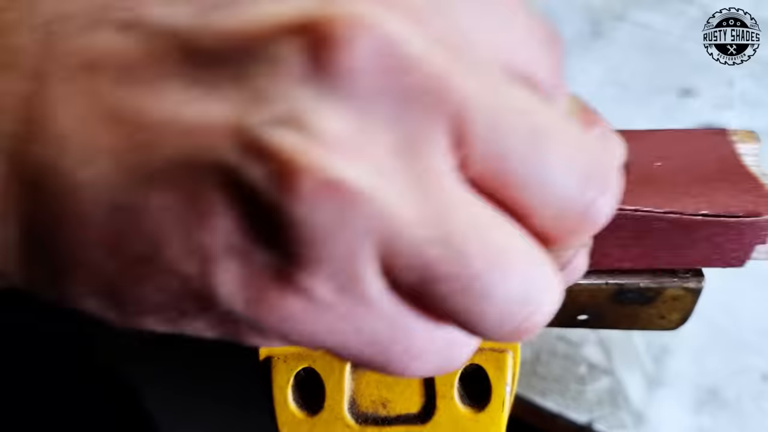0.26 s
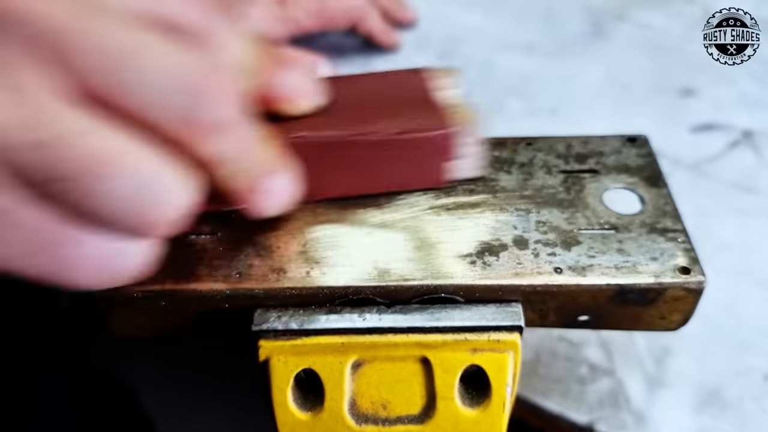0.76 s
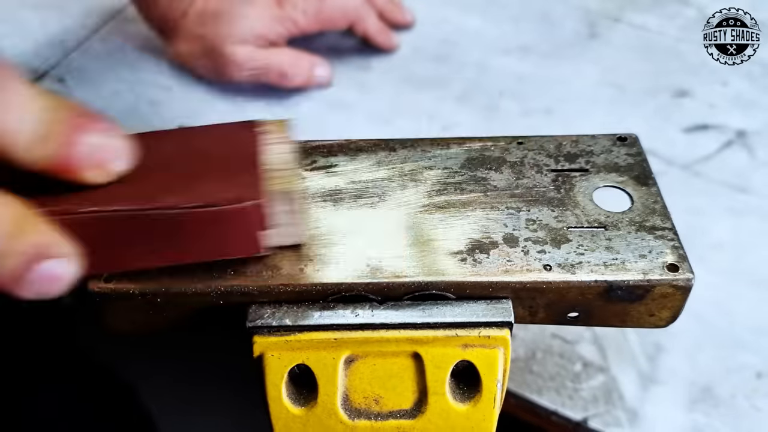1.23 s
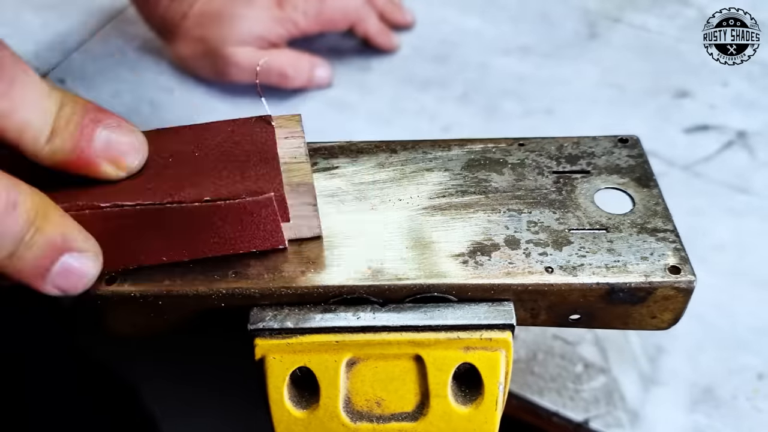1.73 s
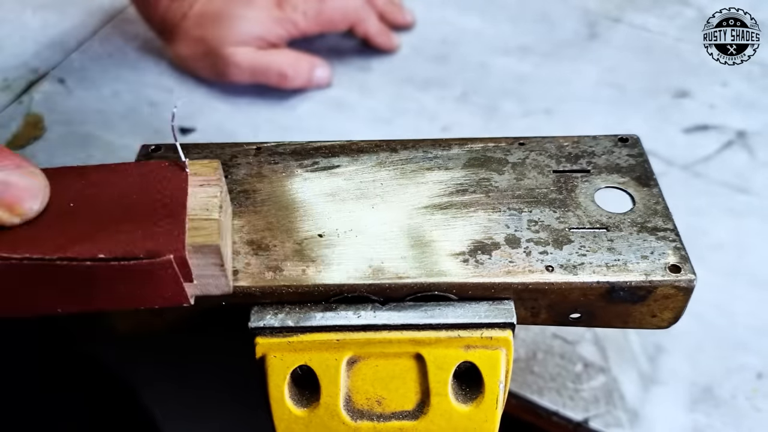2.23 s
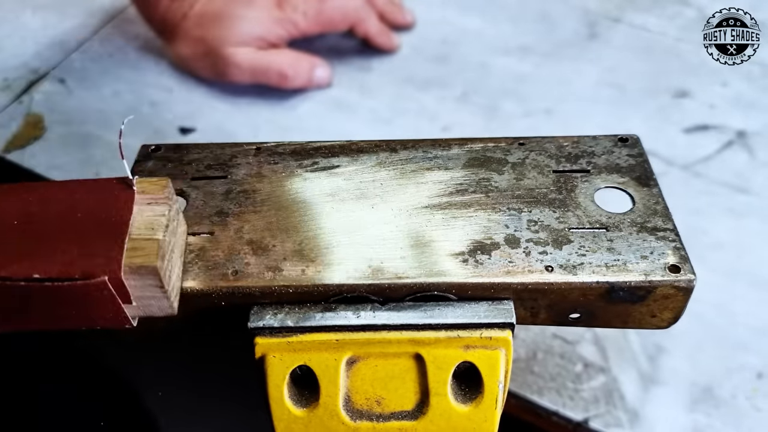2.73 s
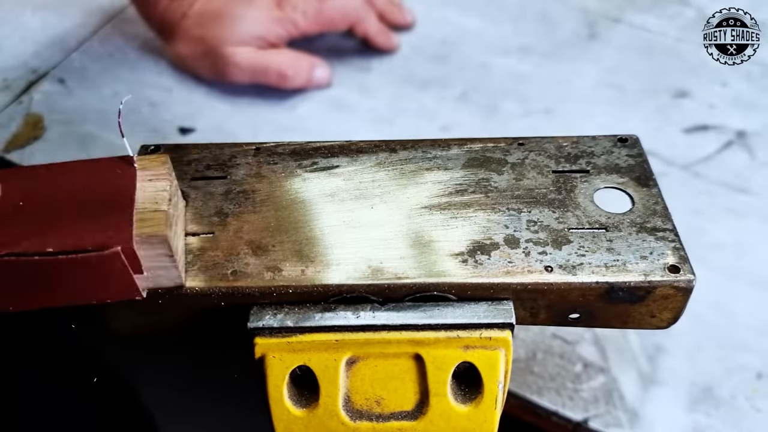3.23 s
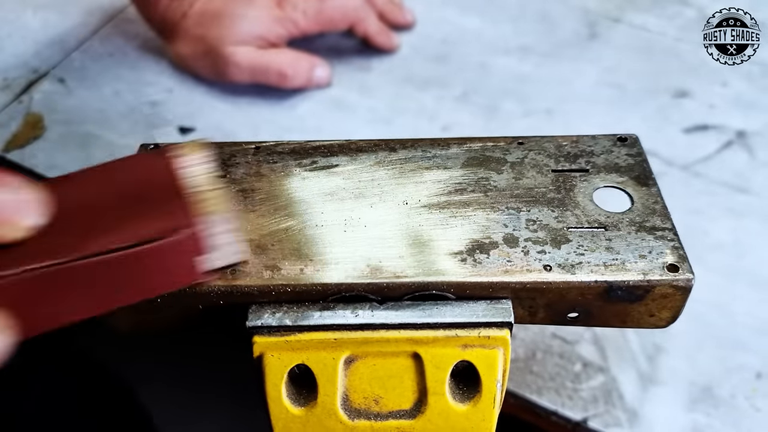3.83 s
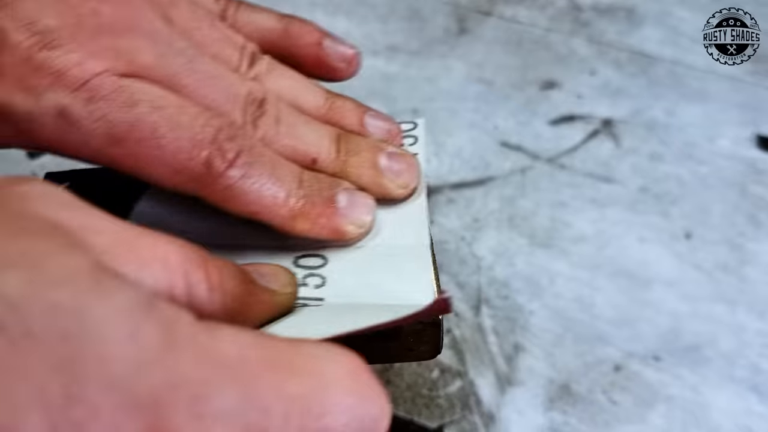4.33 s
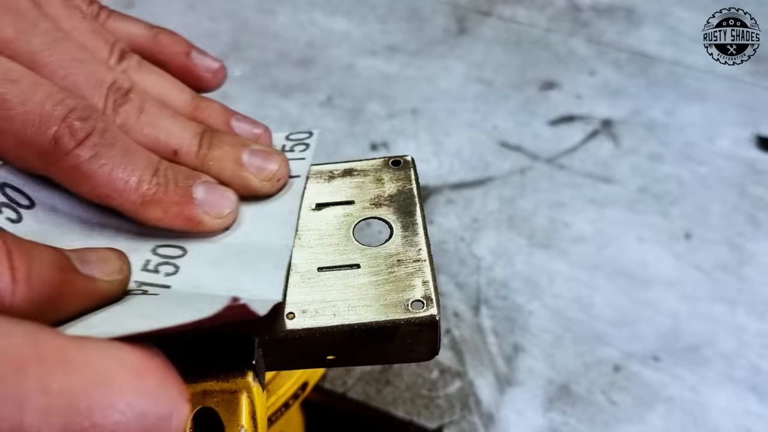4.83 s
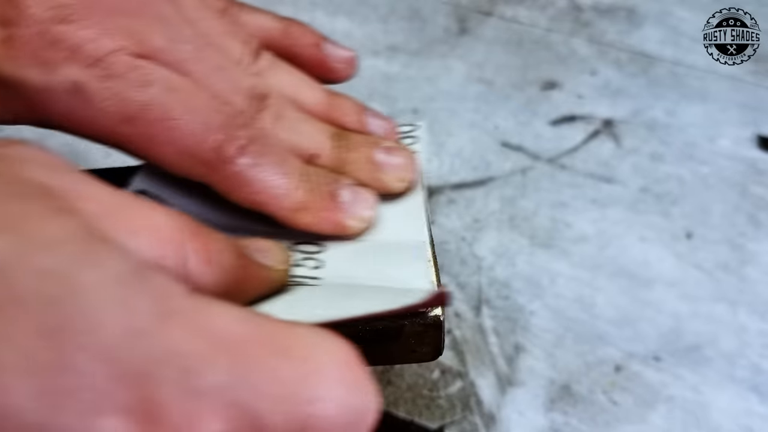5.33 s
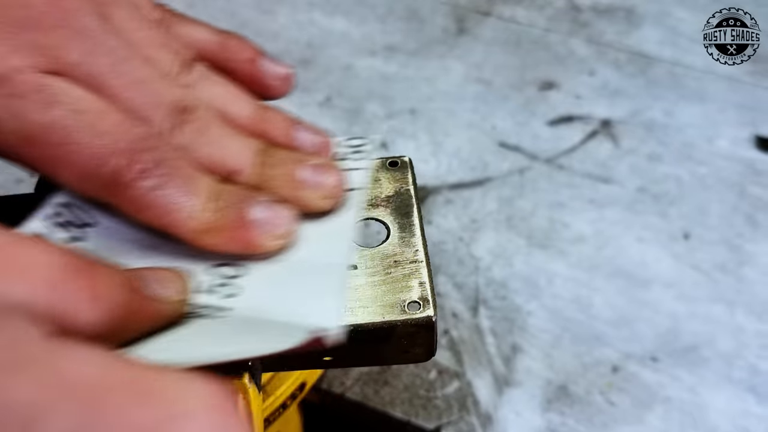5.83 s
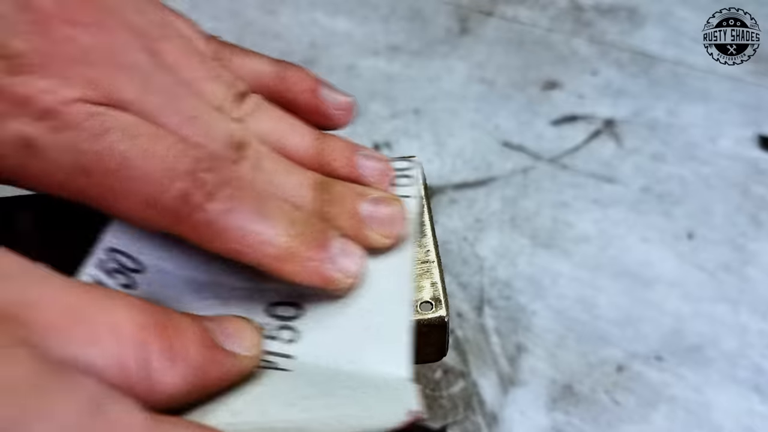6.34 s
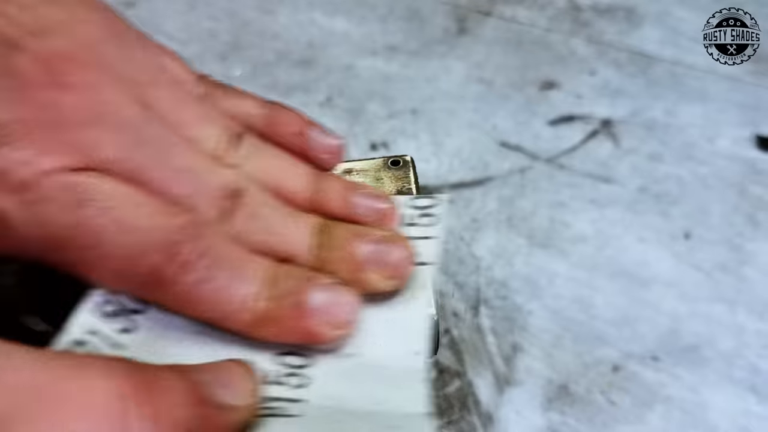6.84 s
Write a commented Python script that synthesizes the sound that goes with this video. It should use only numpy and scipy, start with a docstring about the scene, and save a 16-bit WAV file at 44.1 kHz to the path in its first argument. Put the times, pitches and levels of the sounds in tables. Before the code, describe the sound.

Close stereo sanding of a brass plate in a vice, in a quiet workshop with a short, faint room response. From 0 to about 4.2 seconds a wrapped block scrubs back and forth at roughly twelve strokes a second, scarcely pausing at the turns. At first it is bright, gritty hiss with rough catches, strongest around 0.2 to 1 second. After about 2.2 seconds it grows duller, hollower and quieter, with brief brassy ringing on the catches. Low bench rumble and soft thuds pulse underneath. At 4.2 seconds a loose sheet takes over at half the pace, about six strokes a second: longer papery scrapes, raspier on the pull, the plate damped and drumming faintly on pushes. Snags rasp near 4.8 and 6.6 seconds, ticks snap near 4.8, 6.1 and 6.4, with light finger knocks from 6. The strokes strengthen until the end at about 7.1 seconds.

```python
"""Sanding a brass plate by hand

A brass lock plate in a vice is sanded close to a stereo microphone in a workshop, over quiet room tone.
A wrapped block scrubs fast, then a loose sheet goes at half the pace, rasping more on the pull.
Scrapes are coloured grit noise driven by hand speed and pressure; catches and rubbing ring plate modes.
The bench adds low rumble and decaying thuds; sparse reflections add the workshop."""
import sys
import numpy as np
from scipy import signal
from scipy.fft import rfft, irfft, next_fast_len
from scipy.io import wavfile
from scipy.ndimage import uniform_filter1d

SR = 44100
rng = np.random.default_rng(int(sys.argv[2]) if len(sys.argv) > 2 else 0)


def master_out(mix):
    """Clip the mix to full scale and print it as 16-bit PCM to the path in sys.argv[1]."""
    frames = np.transpose(np.atleast_2d(mix))
    ceiling = np.clip(frames, -1, 1)
    pcm = np.round(ceiling * 32767).astype(np.int16)
    wavfile.write(sys.argv[1], SR, pcm)


N = 311787
TIME_S = np.arange(N) / SR
BLOCK_END_S, SHEET_END_S = 4.172, 7.16
EDGE_HZ = 15880

# Event and layer levels are in dB ahead of the mix gains. Strokes alternate, push first.
# Block strokes. Each row: start in seconds, mid-stroke pressure in dB, pressure gained on the way in dB.
BLOCK_STROKES = [(-0.014, -44.5, 2), (0.081, -44.5, -7), (0.18, -45.9, -2), (0.269, -45, -5),
                 (0.354, -46, 0), (0.453, -43.5, -4), (0.532, -44.5, 7.5), (0.635, -42, -3),
                 (0.705, -44.5, 2), (0.79, -45, -1), (0.878, -47.5, 2), (0.973, -44.5, -8),
                 (1.063, -46.5, 3), (1.163, -43.5, -15), (1.247, -44.5, 5), (1.335, -44, -4),
                 (1.418, -43.5, 11), (1.496, -45, -5), (1.585, -43, -1.5), (1.659, -45, -12),
                 (1.743, -44.5, -1), (1.822, -44.1, -5), (1.905, -45.0, 4), (1.987, -43.5, -8.5),
                 (2.075, -43.5, 1), (2.16, -44.5, -8), (2.236, -46.5, -3), (2.314, -47.5, 3),
                 (2.4, -47, -1), (2.48, -45, 0), (2.563, -47, -3), (2.651, -47, 0), (2.733, -49, -1),
                 (2.821, -46.5, 3), (2.91, -47.5, 2), (2.993, -49.1, 6), (3.072, -49, -6), (3.158, -48, -1),
                 (3.234, -49.9, -3), (3.32, -49.7, 4), (3.396, -48.5, 2), (3.483, -50, -1),
                 (3.556, -49.5, -1), (3.628, -51.5, 4), (3.712, -51.5, -2), (3.792, -49.5, 4),
                 (3.873, -51, 0), (3.953, -45, 2), (4.035, -47, 4), (4.112, -52, -8)]
# Sheet strokes. Each row: start in seconds, mid-stroke pressure in dB, pressure gained on the way in dB
# (also raises the hiss), an unused value.
SHEET_STROKES = [(4.205, -49, 5.5, 1.5), (4.39, -50, 2.5, -2.6), (4.547, -47, 4.5, 1.4),
                 (4.729, -45.5, 5.5, -3.2), (4.877, -46, -0.5, -1.7), (5.089, -47.5, 3, -4.7),
                 (5.235, -45, 1, 0.2), (5.425, -45.5, 2.5, -2.9), (5.586, -44, 2.5, 0.7),
                 (5.767, -44.5, 5.5, -1.5), (5.938, -43.5, 2, 0.8), (6.127, -45.5, -1.5, -7.1),
                 (6.28, -43.5, -1, -0.1), (6.452, -44.5, 2.5, -3.9), (6.636, -41.5, 5, 2.7),
                 (6.807, -44.5, 4, -2.2), (6.991, -40, 2.5, -0.1)]
# Stroke shape, push then pull. Each row: share spent speeding up, share spent slowing down.
BLOCK_SWING = [(.27, 0.49), (.56, 0.39)]
SHEET_SWING = [(0.45, .52), (0.29, .5)]
# Tip of the block over the near end of the plate. Each row: time in seconds, tilt (0 = flat).
BLOCK_TILT = [(0, 0.75), (.95, 0.59), (1.3, 0.46), (1.95, .35), (2.3, 0.89), (3, 0.84), (3.6, 1.2),
              (4.05, 0.98)]
# Hiss, rasp and body of the block. Each row: level when flat in dB, change per tilt in dB,
# further change per tilt at full reach in dB.
BLOCK_LAYERS = [(7.5, -8, -2.5), (-0.72, -0.1, 0.5), (-11.3, 7.8, 2)]
# Hiss, rasp and body of the sheet. Each row: level on a push in dB, level on a pull in dB.
SHEET_LAYERS = [(-3, -4.5), (-2.5, 0), (-6, -6.5)]

# Regular catch of the block, push then pull. Each row: share of the stroke, Gaussian sigma in seconds,
# level over the pressure in dB at tilt 1.5.
CATCH_RULE = [(0.725, 0.0087, 3.5), (0.48, .011, -1)]
CATCH_DB_PER_TILT = 15
# Hard catches of the block. Each row: time in seconds, level in dB.
HARD_CATCHES = [(.054, -47.5), (.196, -38), (.332, -40.5), (.517, -41.5), (.547, -41), (.947, -39),
                (.986, -41.5), (2.119, -47.5), (2.285, -46.5), (2.452, -41.5), (2.8, -46), (3.136, -47),
                (3.457, -45.5), (3.524, -48), (3.604, -46.5), (3.768, -47), (3.83, -45.5), (4.131, -50.5)]
# The sheet snags and rasps. Each row: time in seconds, level in dB.
SNAGS = [(4.804, -37.5), (4.96, -44), (5.128, -45.5), (5.467, -47), (6.22, -43.5), (6.583, -40),
         (6.91, -42.5)]
# Fingers knock the sheet on the plate. Each row: time in seconds, level in dB.
KNOCKS = [(4.758, -51.5), (5.278, -62), (5.955, -45), (6.482, -47), (6.893, -43.5)]
# A coarse grain snaps. Each row: time in seconds, level in dB.
TICKS = [(4.797, -39), (6.079, -39), (6.4, -36.5), (6.415, -50)]
HARD_CATCH_SIGMA_S, SNAG_SIGMA_S, KNOCK_SIGMA_S, TICK_SIGMA_S = 0.0083, 0.013, 0.0049, 0.00078

# Spectra of grit, paper, body under them, and catches. Each row: frequency in Hz, relative density in dB.
BLOCK_HISS_SPECTRUM = [(2500, -41), (4000, -5), (5200, -4), (6800, 0.5), (7500, -3), (8300, -9),
                       (10000, -7.5), (12300, -6.5), (13200, -7.5), (15400, -6.5)]
BLOCK_RASP_SPECTRUM = [(1400, -26.5), (2300, -9), (2700, -1.3), (3100, 0.5), (4000, -1.4), (4800, -2.5),
                       (7500, -23.5)]
BLOCK_BODY_SPECTRUM = [(100, -21.5), (160, -16.5), (205, -8.5), (260, -24), (400, -18), (580, -17.5),
                       (720, -1), (1000, -3.5), (1500, 3.5), (2000, 2), (2500, -1), (4000, -14)]
SHEET_HISS_SPECTRUM = [(2500, -19), (4200, -9), (5100, 0), (5800, -0.8), (7100, 2.5), (7700, -5.5),
                       (8500, -8), (11800, -5), (13200, -6), (15400, -4.5)]
SHEET_RASP_SPECTRUM = [(1400, -32), (2300, -15), (2800, -1.5), (3400, 0.5), (4000, -1.5), (4700, -8),
                       (7500, -26.5)]
SHEET_BODY_SPECTRUM = [(100, -21), (155, -57), (210, -10.5), (270, -14.5), (400, -8.5), (500, -8.5),
                       (680, -4.5), (850, -4), (1100, -1.5), (1500, 3), (2000, 0.5), (2500, -1.5),
                       (4000, -28.5)]
CATCH_SPECTRUM = [(150, -24), (205, -5), (270, -24), (400, -13.5), (520, -21.5), (700, 0.5), (1000, -3.5),
                  (1500, -1.5), (2100, -4.5), (3000, -4), (6000, -21), (12000, -48)]
# Spectra of plate drumming, bench rumble and room tone. Each row: frequency in Hz, relative density in dB.
DRUM_SPECTRUM = [(100, -9), (150, -20.5), (190, -2.5), (220, 1.5), (270, -16), (400, -3), (520, -20),
                 (660, 0.5), (900, -24)]
BENCH_SPECTRUM = [(20, -13), (40, -24), (60, -5.5), (79, 6), (100, -1.5), (140, -17), (205, -11.5),
                  (260, -32), (600, -52)]
ROOM_SPECTRUM = [(20, -28), (80, -2.5), (200, -16), (600, -4), (3000, -4), (16000, -19)]
# Wander of the scrape's colour. Each row: frequency in Hz, spread in dB.
COLOUR_WANDER = [(200, 3.5), (800, 3.5), (2000, 2.5), (5000, 2.2), (15000, 3)]

# Plate modes, free and under the flat hand. Each row: frequency in Hz, width in Hz, relative level in dB.
FREE_PLATE_MODES = [(849, 21, -9), (1010, 100, -9), (1421.4, 38, 6.5), (1534, 15, -2), (1720, 15, -45),
                    (1850, 23, 3)]
DAMPED_PLATE_MODES = [(1156, 350, 0)]
# Freedom of the plate to ring as the block uncovers it. Each row: time in seconds, linear gain.
PLATE_FREEDOM = [(2.0, 0.16), (2.45, 1), (3.5, 1.19), (4.13, 0.83), (4.15, 0.14)]
# The plate drums under the flat hand on pushes. Each row: time in seconds, level in dB.
DRUM_LEVEL = [(4.3, -65.5), (5.0, -60.5), (6.4, -61.5), (6.7, -76)]
# Work shaking the bench. Each row: time in seconds, rumble level in dB, jolt level in dB.
BENCH_SHAKING = [(0, -79, -57), (1.1, -82, -82), (1.5, -74, -64), (2.35, -82, -54.5), (2.6, -77.5, -68),
                 (3.4, -75.5, -57), (4.0, -76, -74), (4.3, -85, -74.5), (5.4, -82.5, -59.5),
                 (6.4, -76, -60.5), (7, -81, -84)]
# Jolt as the hand brakes: share of each block pull, share of each sheet push.
BLOCK_JOLT_SHARE, SHEET_JOLT_SHARE = 0.646, 0.74

# Likeness of the two microphones. Each row: frequency in Hz, correlation (clipped to -1..1 in use).
BLOCK_LIKENESS = [(40, 6.3), (80, 0.5), (200, 0.17), (500, 0.07), (16000, -0.03)]
SHEET_LIKENESS = [(200, 1), (550, 0.14), (1200, 1), (2500, 0.42), (3700, 0.29), (6000, 0.089),
                  (16000, 0.04)]
# Balance of the two microphones. Each row: frequency in Hz, left minus right in dB.
BLOCK_BALANCE = [(60, 8), (92, -3.5), (140, -10), (210, -3), (330, 3.5), (500, 0), (770, 3), (1170, 4.5),
                 (1790, 2), (2740, 1), (4190, -1), (6410, -1), (9810, -0.5), (15000, 2)]
SHEET_BALANCE = [(60, 9), (92, -7), (140, 0), (210, 0), (330, 2.5), (500, 10), (770, 1.5), (1170, 3.5),
                 (1790, 2.5), (2740, 4), (4190, 3.5), (6410, 4), (9810, 0.5), (15000, 3.5)]
# Slow drift of the sanding's left-right balance. Each row: time in seconds, left minus right in dB.
BALANCE_DRIFT = [(0, 0), (1.7, 1), (3.0, 1.4), (3.8, 1.5), (5.3, -1), (6.9, 1.5)]
# Reverberation. Each row: frequency in Hz, 60 dB decay time in seconds.
WORKSHOP_T60 = [(100, 0.45), (1000, 0.27), (4000, 0.2), (9000, 0.15), (16000, 0.13)]


def amp(db):
    """Decibels to linear gain."""
    return 10 ** (np.asarray(db) / 20)


def over_hz(points, hz):
    """Table interpolated on a log-frequency axis."""
    point_hz, value = np.transpose(points)
    return np.interp(np.log(hz + 1), np.log(point_hz), value)


def over_time(points):
    """Two-column table interpolated at every sample."""
    return np.interp(TIME_S, *np.transpose(points))


def convolve(x, response):
    """Convolution with responses scaled to unit energy."""
    response = np.atleast_2d(response)
    unit_response = response / np.linalg.norm(response, axis=1, keepdims=True)
    return signal.oaconvolve(x, unit_response, axes=1)[:, :N]


def colour(x, spectrum, size=4096):
    """Minimum-phase filter of the given spectrum, falling away below its lowest point."""
    hz = abs(np.fft.fftfreq(size, 1 / SR))
    low_cut = np.minimum((hz + 10) / spectrum[0][0], 1) ** 2
    log_gain = np.log(amp(over_hz(spectrum, hz)) * low_cut)
    minimum_phase = np.exp(np.conj(signal.hilbert(log_gain)))
    return convolve(x, np.fft.ifft(minimum_phase).real)


def grit(per_s, spread_db, smooth):
    """Uneven clicks of grains cutting metal, mixed with the smooth hiss of the finest."""
    size = amp(spread_db * np.clip(rng.standard_normal(N), -2, 2)) * (rng.random(N) < per_s / SR)
    clicks = size * rng.standard_normal((2, N))
    share = np.clip(smooth, 0, 1)
    return np.sqrt(1 - share) * clicks / clicks.std() + np.sqrt(share) * rng.standard_normal((2, N))


def chatter(top_hz, depth_db, low_hz=20):
    """Uneven contact: a random gain of unit RMS, band-shaped in rate."""
    size = next_fast_len(N)
    hz = np.fft.rfftfreq(size, 1 / SR)
    band = hz / (hz + low_hz) / (1 + (hz / top_hz) ** 2)
    wobble = irfft(rfft(rng.standard_normal(size)) * band, size)[:N]
    gain = amp(depth_db * np.clip(wobble / wobble.std(), -2, 2))
    return gain / np.sqrt(np.mean(gain ** 2))


def turns_of(strokes, end_s):
    """Stroke starts plus the last end, in seconds."""
    return np.array([row[0] for row in strokes] + [end_s])


def progress(strokes, end_s):
    """Strokes done so far: even counts begin a push, odd ones a pull."""
    turns_s = turns_of(strokes, end_s)
    return np.interp(TIME_S, turns_s, np.arange(len(turns_s)))


def stroke_of(strokes, end_s):
    """Index of the stroke under way."""
    return np.minimum(progress(strokes, end_s).astype(int), len(strokes) - 1)


def reach_of(strokes, end_s):
    """Hand position along the plate, -1 (near) to 1 (far)."""
    return -np.cos(np.pi * progress(strokes, end_s))


def moments(strokes, end_s, share):
    """Time in seconds at which each stroke is the given share done."""
    turns_s = turns_of(strokes, end_s)
    return turns_s[:-1] + share * np.diff(turns_s)


def swell(at_s, sigma_s):
    """Gaussian rise and fall of force."""
    force = np.zeros(N)
    near = slice(*np.searchsorted(TIME_S, [at_s - 10 * sigma_s, at_s + 10 * sigma_s]))
    force[near] = np.exp(-.5 * ((TIME_S[near] - at_s) / sigma_s) ** 2)
    return force


def swells(events, sigma_s):
    """Sum of one swell per event."""
    return sum(amp(db) * swell(at_s, sigma_s) for at_s, db in events)


def ports(x, likeness, balance, lag_ms):
    """Two microphones share part of the sound; it reaches the right one later."""
    size = next_fast_len(N + 1000)
    hz = np.fft.rfftfreq(size, 1 / SR)
    left, other = rfft(x, size)
    same = np.clip(over_hz(likeness, hz), -1, 1)
    ratio = amp(over_hz(balance, hz))
    delay = np.exp(-2j * np.pi * hz * lag_ms / 1000)
    right = (same * left + np.sqrt(1 - same ** 2) * other) * delay
    return irfft(np.array([ratio * left, right]) * np.sqrt(2 / (1 + ratio ** 2)), size)[:, :N]


def room_tone():
    """Steady quiet noise of the room."""
    return amp(-66.5) * colour(rng.standard_normal((2, N)), ROOM_SPECTRUM)


def workshop(x, size=256, count=700):
    """Sparse reflections of random sign; the treble dies first."""
    taps = np.zeros((2, SR // 2))
    at = 20 * (np.arange(count) + 10) + rng.integers(0, 20, (2, count))
    np.put_along_axis(taps, at, rng.choice([-1., 1.], at.shape), 1)
    hz, t, z = signal.stft(taps, SR, nperseg=size)
    decay = np.exp(-np.log(1000) * t / over_hz(WORKSHOP_T60, hz)[:, None])
    return convolve(x, signal.istft(z * decay, SR, nperseg=size)[1])


def bench_rumble():
    """The work shakes the bench: low noise of fluctuating level."""
    times_s, rumble_db, _ = np.transpose(BENCH_SHAKING)
    shake = amp(np.interp(TIME_S, times_s, rumble_db)) * chatter(top_hz=8.8, depth_db=3.0, low_hz=3)
    rumble = colour(shake * rng.standard_normal((2, N)), BENCH_SPECTRUM)
    return ports(rumble, BLOCK_LIKENESS, BLOCK_BALANCE, lag_ms=.05)


def bench_thuds(hz=78, peak_s=0.015, detune=0.28, rocking_rad=0.93, scatter_s=0.0084, scatter_db=2.5):
    """Braking strokes jolt the bench: decaying sines, their phase rocking from side to side."""
    times_s, _, jolt_db = np.transpose(BENCH_SHAKING)
    pulls_s = moments(BLOCK_STROKES, BLOCK_END_S, BLOCK_JOLT_SHARE)[1::2]
    pushes_s = moments(SHEET_STROKES, SHEET_END_S, SHEET_JOLT_SHARE)[::2]
    jolts_s = np.r_[pulls_s, pushes_s]
    thuds = np.zeros((2, N))
    t = TIME_S[:SR // 4]
    envelope = (t / peak_s * np.exp(1 - t / peak_s)) ** 2
    for at_s, (pitch, sway, late, harder) in zip(jolts_s, rng.uniform(-0.86, 1, (len(jolts_s), 4))):
        side_phase = rocking_rad * sway * np.array([[-1], [1]])
        wave = np.sin(2 * np.pi * hz * (1 + detune * pitch) * t + side_phase)
        level_db = np.interp(at_s, times_s, jolt_db) + scatter_db * harder
        thud = amp(level_db) * envelope * wave
        start = round((at_s + scatter_s * late - peak_s / 2) * SR)
        part = thuds[:, start:][:, :len(t)]
        part += thud[:, :part.shape[1]]
    # the bench top radiates little below its lowest mode
    thuds = signal.sosfilt(signal.butter(4, 50, "highpass", fs=SR, output="sos"), thuds)
    return thuds * amp([[-1.5], [1]])


def plate(x, modes, tuning):
    """Brass rings in quickly dying modes, their pitch scaled by the tuning factor."""
    sound, power = 0, 0
    for hz, width_hz, db in modes:
        turn = np.exp(2j * np.pi * np.cumsum(hz * tuning) / SR)
        r = np.exp(-np.pi * width_hz / SR)
        # one-pole low-pass at baseband, shifted back up to the mode
        ring = turn * signal.lfilter([1 - r], [1, -r], x / turn + 1e-18)
        sound = sound + amp(db) * ring.real
        power += amp(db) ** 2 * (1 - r) / (1 + r) / 2
    return sound / np.sqrt(power)


def shifting(x, size=512):
    """The patch of grit in contact keeps changing, and the scrape's colour with it."""
    hz, _, z = signal.stft(x, SR, nperseg=size)
    patches = rng.standard_normal(z.shape[1:])
    for _ in range(2):
        patches = uniform_filter1d(patches, size=5, axis=1)
        patches = uniform_filter1d(patches, size=2, axis=0)
    gain = amp(over_hz(COLOUR_WANDER, hz)[:, None] * patches / patches.std())
    gain = gain / np.sqrt(np.mean(gain ** 2, axis=1, keepdims=True))
    return signal.istft(z * gain, SR, nperseg=size)[1][:, :N]


def rubbing(strokes, end_s, swing, layers_db, powers, floor, uneven_db):
    """Strength of hiss, rasp and body: pressure times each layer's own power of hand speed."""
    stroke = stroke_of(strokes, end_s)
    done = progress(strokes, end_s) - stroke
    rise, fall = np.array(swing)[stroke % 2].T
    pressure_db, lean_db = np.array(strokes)[stroke, 1:3].T
    speeding_up = np.sin(np.pi / 2 * np.minimum(done / rise, 1))
    slowing_down = np.sin(np.pi / 2 * np.minimum((1 - done) / fall, 1))
    touching = (TIME_S >= strokes[0][0]) * (TIME_S < end_s)
    pressure = amp(pressure_db + lean_db * (done - .5)) * touching
    # a floor keeps the scrape faintly sounding at each turn
    speed = np.hypot(speeding_up * slowing_down, floor)
    strength = pressure * amp(layers_db) * speed ** np.array(powers)[:, None]
    return uniform_filter1d(strength, size=120, axis=1) * chatter(top_hz=35, depth_db=uneven_db, low_hz=24)


def sheet(bend=0.25):
    """Slow rubbing of the loose sheet; the flat hand damps the plate, which drums on pushes."""
    stroke = stroke_of(SHEET_STROKES, SHEET_END_S)
    reach = reach_of(SHEET_STROKES, SHEET_END_S)
    layers_db = np.array(SHEET_LAYERS, float)[:, stroke % 2]
    # the pressure gained on the way also raises the hiss
    layers_db[0] += np.array(SHEET_STROKES)[stroke, 2]
    strength = rubbing(SHEET_STROKES, SHEET_END_S, SHEET_SWING, layers_db,
                       powers=(2.5, 1.7, 1.45), floor=0.3, uneven_db=0.6)
    accents = np.array([swells(TICKS, TICK_SIGMA_S), swells(SNAGS, SNAG_SIGMA_S),
                        swells(KNOCKS, KNOCK_SIGMA_S)])
    hiss, rasp, body = np.hypot(strength, accents) * chatter(top_hz=276, depth_db=-0.55)
    sound = amp(-1.0) * colour(hiss * grit(per_s=6000, spread_db=1.5, smooth=0.48), SHEET_HISS_SPECTRUM)
    sound += amp(-0.86) * colour(rasp * grit(per_s=4100, spread_db=3.5, smooth=0.68), SHEET_RASP_SPECTRUM)
    sound += amp(-1.5) * colour(body * grit(per_s=2200, spread_db=5.0, smooth=0.84), SHEET_BODY_SPECTRUM)
    # the mode's pitch falls as the hand reaches out
    drive = body * grit(per_s=2600, spread_db=3.0, smooth=0.65)
    sound += amp(-7.5) * plate(drive, DAMPED_PLATE_MODES, 1 - bend * reach)
    # only the push presses hard enough to make the plate drum
    pushing = np.maximum(np.gradient(reach), 0)
    drum = amp(over_time(DRUM_LEVEL)) * np.sqrt(pushing / pushing.max())
    sound += colour(drum * grit(per_s=880, spread_db=3.5, smooth=0.34), DRUM_SPECTRUM)
    return ports(sound, SHEET_LIKENESS, SHEET_BALANCE, lag_ms=0.28)


def catching(tilt, scatter_s=0.003, scatter_db=2.0):
    """Force of the block catching: once a stroke, harder as it tips, plus the hard catches."""
    force = np.zeros(N)
    for k, (late, harder) in enumerate(rng.standard_normal((len(BLOCK_STROKES), 2))):
        share, sigma_s, over_db = CATCH_RULE[k % 2]
        at_s = moments(BLOCK_STROKES, BLOCK_END_S, share)[k] + scatter_s * late
        level_db = BLOCK_STROKES[k][1] + over_db + scatter_db * harder
        force += amp(level_db) * swell(at_s, sigma_s)
    regular = force * amp(CATCH_DB_PER_TILT * (tilt - 1.5))
    return np.maximum(regular, swells(HARD_CATCHES, HARD_CATCH_SIGMA_S))


def block():
    """Fast rubbing of the sanding block; catches and body drive the free plate."""
    tilt, reach = over_time(BLOCK_TILT), reach_of(BLOCK_STROKES, BLOCK_END_S)
    # flat, the block hisses; tipped, it sounds duller and hollower, most of all at full reach
    layers_db = np.array([flat_db + tilt * (tilt_db + far_db * reach)
                          for flat_db, tilt_db, far_db in BLOCK_LAYERS])
    hiss, rasp, body = rubbing(BLOCK_STROKES, BLOCK_END_S, BLOCK_SWING, layers_db,
                               powers=(1.8, 1.3, .7), floor=0.29, uneven_db=0.64)
    contact = chatter(top_hz=240, depth_db=-1.6)
    catch = catching(tilt)
    hiss_grit = hiss * contact * grit(per_s=8000, spread_db=0.0, smooth=0.41)
    rasp_grit = rasp * contact * grit(per_s=4500, spread_db=3.0, smooth=0.67)
    body_grit = body * chatter(top_hz=120, depth_db=1.4) * grit(per_s=2500, spread_db=3.5, smooth=0.45)
    catch_grit = catch * grit(per_s=1600, spread_db=6.5, smooth=0.74)
    scrape = amp(2.1) * colour(hiss_grit, BLOCK_HISS_SPECTRUM)
    scrape += amp(0.2) * colour(rasp_grit, BLOCK_RASP_SPECTRUM)
    scrape += amp(-1.0) * colour(body_grit, BLOCK_BODY_SPECTRUM)
    scrape += amp(-4.5) * colour(catch_grit, CATCH_SPECTRUM)
    drive = over_time(PLATE_FREEDOM) * (amp(-1.0) * catch + amp(-6.2) * body)
    tuning = chatter(top_hz=8, depth_db=0.085, low_hz=3)
    ring = plate(drive * grit(per_s=2000, spread_db=4.5, smooth=0.56), FREE_PLATE_MODES, tuning)
    return ports(shifting(scrape) + ring, BLOCK_LIKENESS, BLOCK_BALANCE, lag_ms=0.052)


def scene():
    """Room tone, bench, and sanding with its reflections."""
    pan_db = over_time(BALANCE_DRIFT)
    sanding = (block() + shifting(sheet())) * amp(np.array([pan_db, -pan_db]) / 2)
    reflections = amp(-11) * workshop(sanding)
    return room_tone() + bench_rumble() + bench_thuds() + reflections + sanding


def record(dry):
    """The recorder's band limit: a linear-phase low-pass."""
    low_pass = signal.firwin(601, EDGE_HZ, window=("kaiser", 8), fs=SR)
    return signal.oaconvolve(dry, low_pass[None], "same", axes=1)


dry = scene()
out = record(dry)
master_out(out)
```